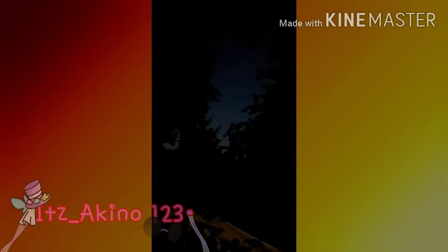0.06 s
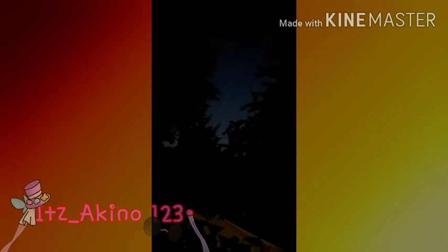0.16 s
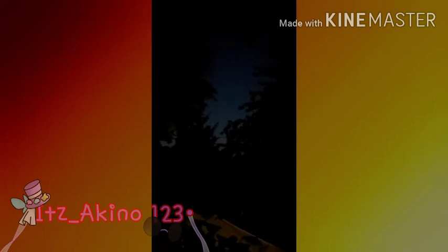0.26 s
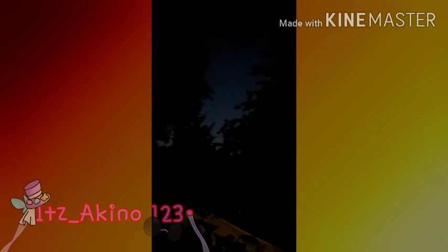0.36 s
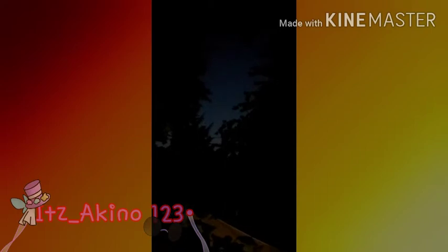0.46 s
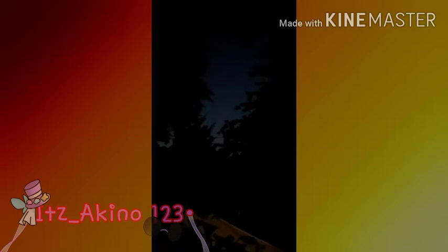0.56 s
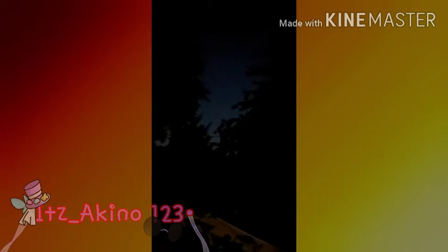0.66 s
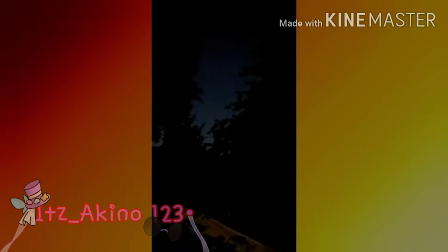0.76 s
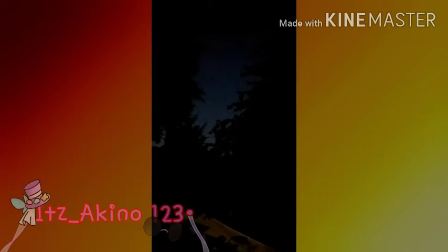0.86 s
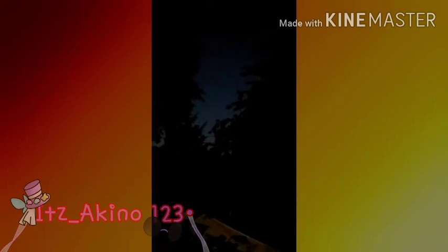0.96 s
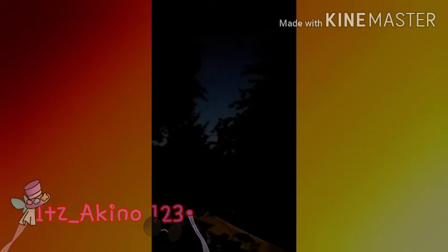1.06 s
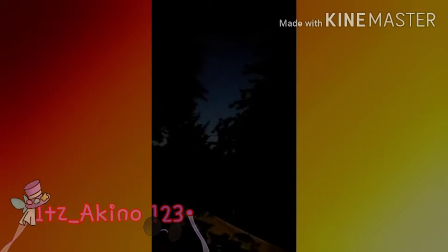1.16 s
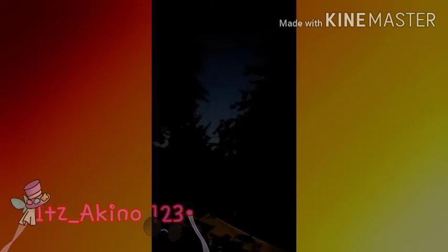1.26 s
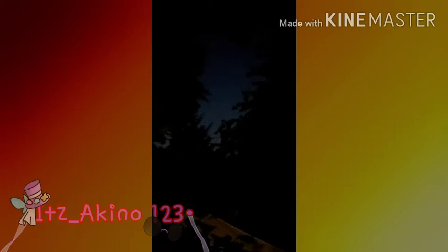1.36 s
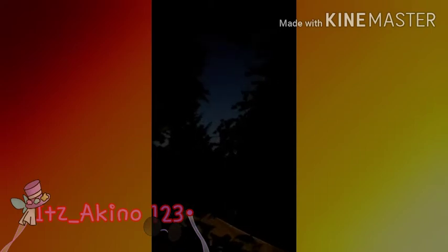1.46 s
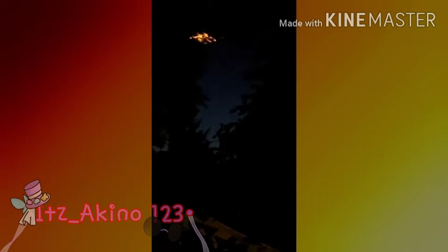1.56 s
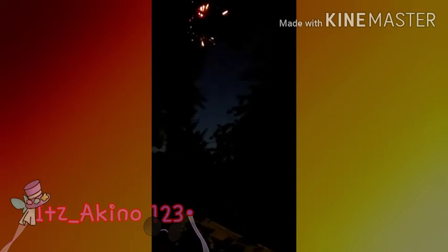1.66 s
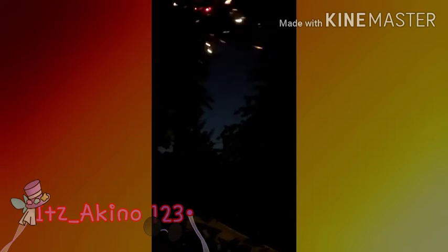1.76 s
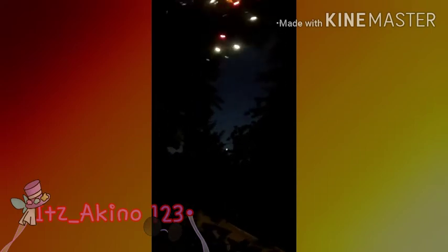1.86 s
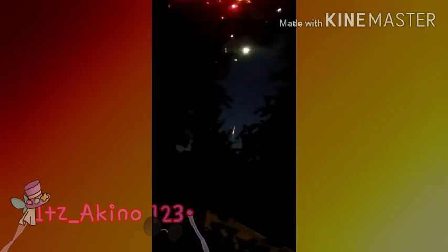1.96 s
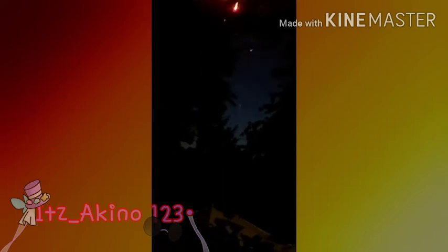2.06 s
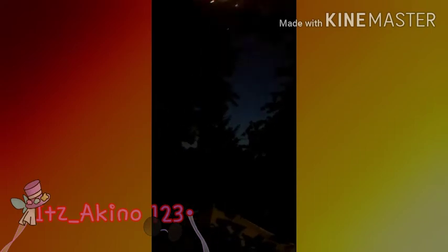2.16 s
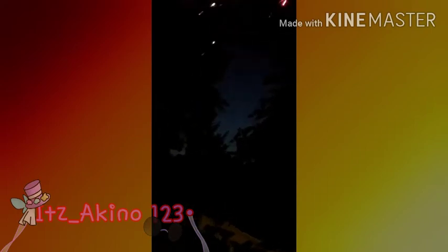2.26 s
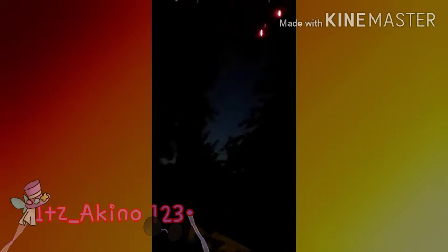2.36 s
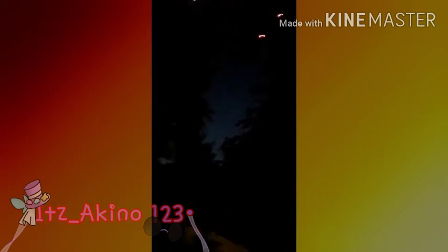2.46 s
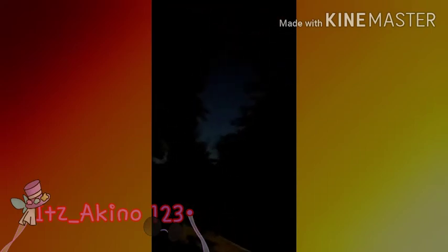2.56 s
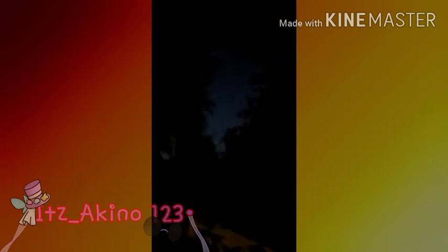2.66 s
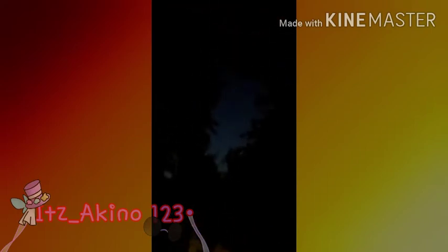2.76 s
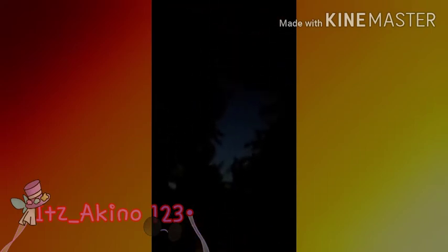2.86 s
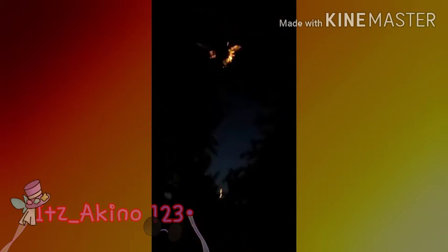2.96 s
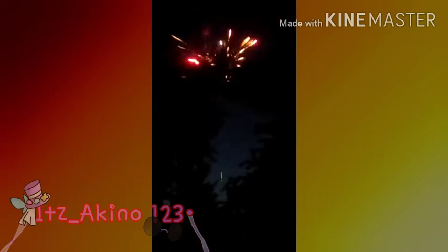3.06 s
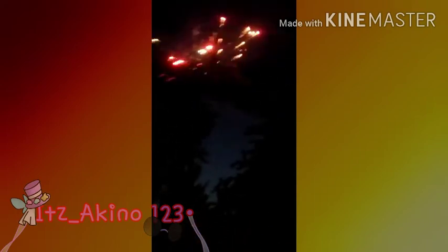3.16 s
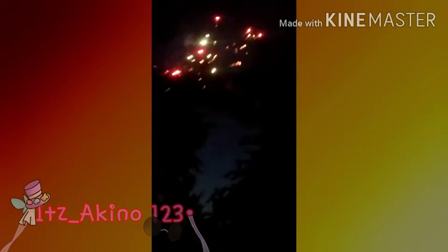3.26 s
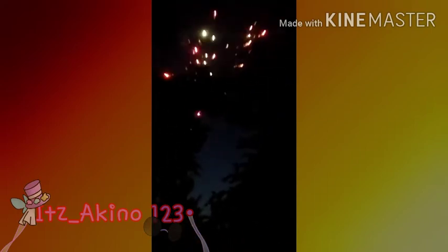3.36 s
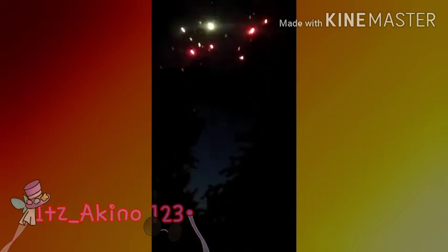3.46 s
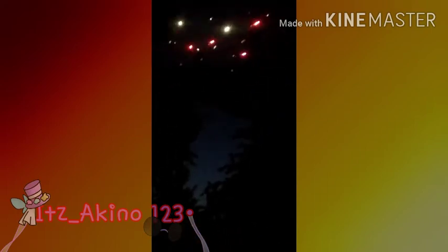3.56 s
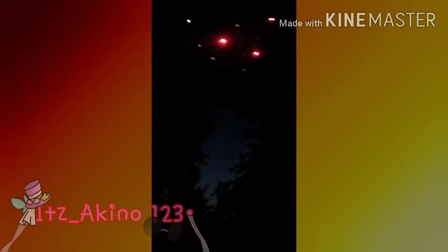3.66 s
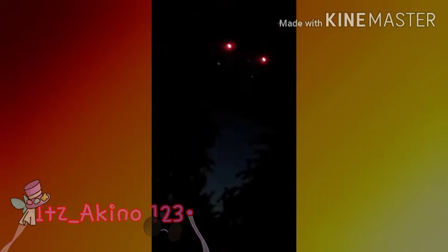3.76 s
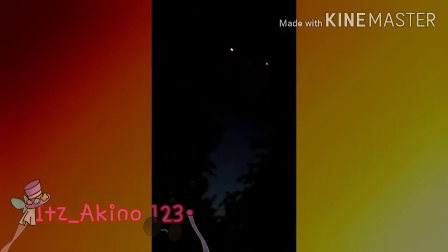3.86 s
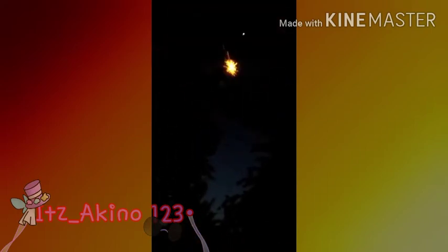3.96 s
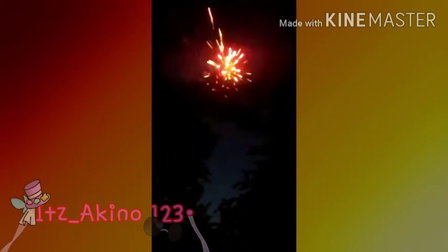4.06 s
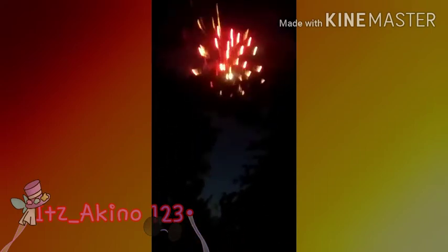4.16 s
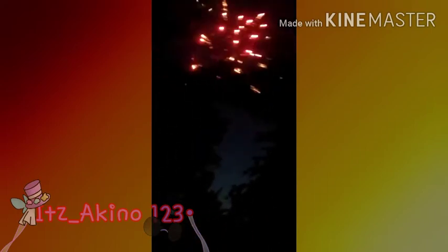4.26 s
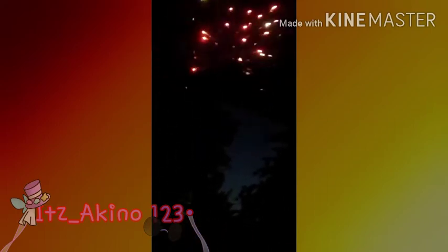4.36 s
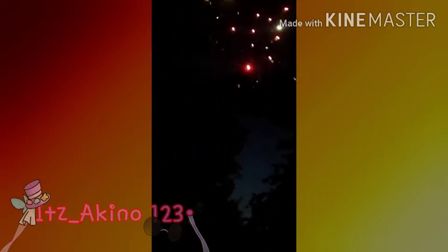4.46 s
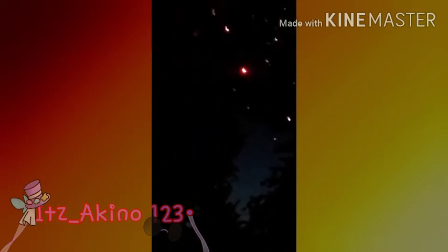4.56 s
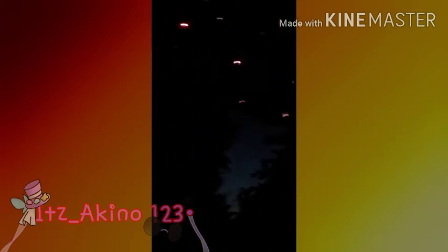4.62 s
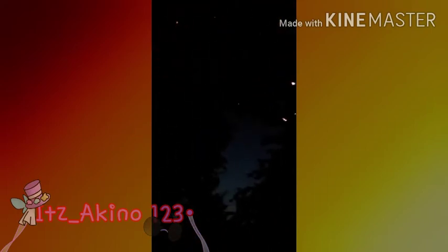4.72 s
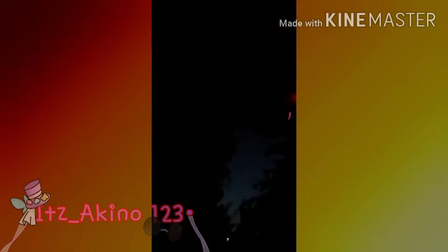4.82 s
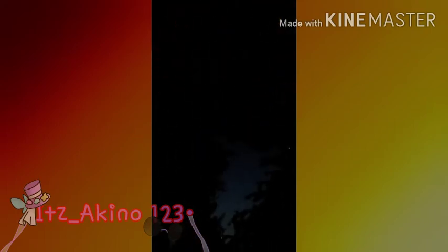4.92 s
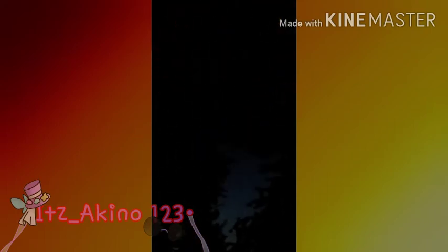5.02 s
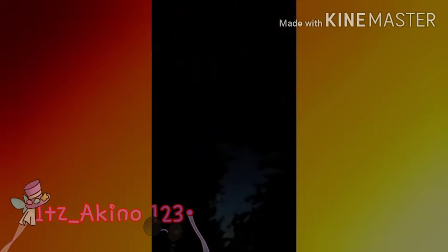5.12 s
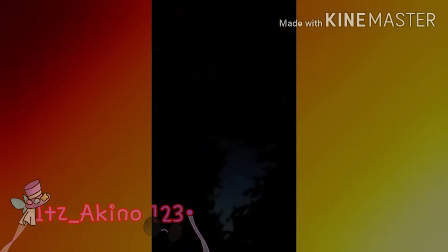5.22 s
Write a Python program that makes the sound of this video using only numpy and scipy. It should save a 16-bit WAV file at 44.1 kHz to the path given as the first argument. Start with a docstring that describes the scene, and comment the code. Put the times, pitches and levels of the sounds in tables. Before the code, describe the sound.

Soft outdoor night air runs throughout. From about 0.5 to 1.7 seconds a fuse hisses very faintly, and several quiet, dull thumps of far fireworks sound. At 1.8 seconds a shell bursts overhead with a sharp bang, and another follows at 2.1. Each bang slaps quickly off nearby walls and scatters through trees in a tail of over a second, with a faint fizz of burning stars. Sparks spit with small pops at 2.5 and 2.6 seconds. A hollow launch thump at 3.0 leads to a third bang at 3.2. The fourth bang comes at 4.3 seconds, followed by faint sputters. Two dull, echoing thumps sound at 4.8 and 5.2 seconds. Everything is heard from the ground through a small, honky microphone with almost no bass, which overloads on the four bursts.

```python
"""Fireworks at night

Four shells burst overhead, each a shock front and a few pressure swings; house walls slap back and
trees scatter the bang into a long tail. Around them: dull thumps of launches and far fireworks,
fizzing stars, sputtering sparks, a faint fuse hiss and soft night air. A small, honky microphone
with almost no bass picks it all up and overloads on the bursts."""
import sys
import numpy as np
from scipy import signal
from scipy.fft import rfft, irfft, next_fast_len
from scipy.io import wavfile
from scipy.ndimage import map_coordinates

SR = 44100
rng = np.random.default_rng(int(sys.argv[2]) if len(sys.argv) > 2 else 0)


def to_wav(sig):
    """Store sig (one row per channel, or 1-D mono) as 16-bit WAV at the path in sys.argv[1].

    Samples outside -1..1 are clipped; the rate is SR.
    """
    pcm = np.clip(np.atleast_2d(sig), -1, 1) * 32767
    pcm = np.round(pcm).astype(np.int16)
    wavfile.write(sys.argv[1], SR, pcm.T)  # frames by channels


N = 233156
TIME = np.arange(N) / SR
AGE = np.arange(2 * SR) / SR  # seconds since an event
FFT_SIZE = next_fast_len(N + SR)
FREQ = np.fft.rfftfreq(FFT_SIZE, 1 / SR)

# shell bursts (time [s], blast [dB], ring [Hz], crack [dB], yard scatter [dB], tree tail [dB],
# echo tilt [dB/octave], echo honk [dB], hollowness [dB], slap [dB], slap delay [ratio], fizz [dB])
SHELLS = [(1.8083, -18, 757, -11.5, -12, -21, 0, 1, 1, -9, 0.99, -57),
          (2.1450, -11, 1000, -10, -10, -22, 0, -1, .5, -9.5, 1, -41),
          (3.2298, -16, 1017, -13, -12.5, -24, 0.5, 1, 1, -10.5, .99, -44),
          (4.2533, -13, 990, -9, -11.5, -23, 0.5, 0.5, 5.5, -11.5, 1.05, -42)]


def amp(db):
    """Decibels to gain."""
    return 10 ** (np.asarray(db) / 20)


def unit(x):
    """Scale to rms 1."""
    return x / np.sqrt(np.mean(x ** 2) + 1e-20)


def along(points, hz):
    """Read (frequency [Hz], value) points on a log axis."""
    freqs, values = np.transpose(points)
    return np.interp(np.log(hz + 1), np.log(freqs), values)


def bell(x, centre, width):
    """A Gaussian bump of height 1."""
    return np.exp(-.5 * ((x - centre) / width) ** 2)


def add(track, s, sound):
    """Mix a sound into the track at time s."""
    part = track[round(s * SR):][:len(sound)]
    part += sound[:len(part)]


def wobble(rate, n):
    """A smooth random curve, rate knots a second."""
    knots = rng.standard_normal(int(n * rate / SR) + 4)
    return map_coordinates(knots, [np.arange(n) * rate / SR])


def coloured(x, gain):
    """Minimum-phase EQ with the given gain at each frequency: nothing rings ahead of a hit."""
    cepstrum = irfft(np.log(np.maximum(gain, 1e-6)), FFT_SIZE)
    cepstrum[1:FFT_SIZE // 2] *= 2
    cepstrum[FFT_SIZE // 2 + 1:] = 0
    return irfft(rfft(x, FFT_SIZE) * np.exp(rfft(cepstrum)), FFT_SIZE)[:len(x)]


def tilted(x, db_per_octave):
    """Brighten or dull a sound around 800 Hz."""
    return coloured(x, amp(db_per_octave * np.log2(np.clip(FREQ, 150, 8000) / 800)))


def noise(colour):
    """Steady noise shaped by (frequency [Hz], level [dB]) points."""
    return coloured(rng.standard_normal(N), amp(along(colour, FREQ)))


def puff(t60):
    """A short, dying burst of noise."""
    return rng.standard_normal(len(AGE)) * amp(-60 * AGE / t60)


def pressure_swing(hz, t60):
    """A few strong swings of pressure that start at full size."""
    return -np.cos(2 * np.pi * hz * AGE) * amp(-60 * AGE / t60)


def scatter(decay, rise_s, clump_db):
    """Countless echoes that build up, arrive in clumps, roll and die at each frequency's own speed."""
    hz, t, spectrum = signal.stft(rng.standard_normal(len(AGE)), SR, nperseg=256)
    fade = amp(-60 * t / along(decay, hz)[:, None])
    tail = signal.istft(spectrum * fade, SR, nperseg=256)[1][:len(AGE)]
    roll_db = .7 * wobble(25, len(AGE))
    build_up = 1 - np.exp(-AGE / rise_s)
    return tail * build_up * amp(clump_db * wobble(250, len(AGE)) + roll_db)


def night_air():
    """A soft, restless bed of outdoor noise."""
    # the bed's slow drift (time [s], level [dB])
    drift = [(0, -56.5), (1.7, -59.5), (2.9, -55.5), (5.3, -55)]
    # its tone (frequency [Hz], level [dB])
    colour = [(150, 12), (300, 9.5), (700, 0.5), (1100, -2.5), (2000, 5.5), (3000, 3), (5500, 2),
              (9000, 0.5)]
    level_db = np.interp(TIME, *np.transpose(drift)) + .8 * wobble(19, N)
    return amp(level_db) * noise(colour)


def fuse(attack_s=0.058, release_s=0.13, flutter_db=2.5):
    """A fuse hisses faintly on the ground before the first shell: each spurt swells, holds and dies."""
    # spurts of flame (time [s], length [s], level [dB])
    spurts = [(.45, 0.4, -41), (1.30, 0.098, -42.5), (1.52, .08, -42)]
    # the flame's thin hiss (frequency [Hz], level [dB])
    hiss = [(2500, -38), (4200, -17), (5500, -7), (6400, -7.5), (8000, -3), (15000, -6)]
    flame = np.zeros(N)
    for s, length, db in spurts:
        swell = np.clip((TIME - s) / attack_s, 0, 1)
        fade = np.clip(1 - (TIME - s - length) / release_s, 0, 1)
        flame += amp(db) * swell * fade
    return flame * amp(flutter_db * wobble(30, N)) * noise(hiss)


def stars(peak_s=.45, width_s=.25, crackle_db=3):
    """The stars of each shell flare up after the burst and burn out with a fine, crackling fizz."""
    # the sizzle of burning stars (frequency [Hz], level [dB])
    sizzle = [(2500, -35), (5000, -18), (8000, 8), (11000, 7), (15000, 1)]
    out = np.zeros(N)
    burn = bell(AGE, peak_s, width_s)
    for s, *_, fizz_db in SHELLS:
        crackle = amp(fizz_db + crackle_db * wobble(300, len(AGE)))
        add(out, s, burn * crackle * rng.standard_normal(len(AGE)))
    return coloured(out, amp(along(sizzle, FREQ)))


def sparks(pop_hz=1880, attack_s=0.00057):
    """Burning stars spit briefly with a small pitched pop."""
    # sputtering sparks (time [s], spit [dB], pop [dB])
    sputters = [(2.496, -23.5, -46), (2.626, -15, -29), (4.049, -39, -62), (4.538, -29, -61),
                (4.863, -37.5, -55)]
    # the bright tone of a spit (frequency [Hz], level [dB])
    colour = [(300, -23), (1200, -17), (2500, -23), (4000, -10), (6000, 1.5), (8000, 0), (15000, 4)]
    out = np.zeros(N)
    attack = 1 - np.exp(-AGE / attack_s)
    for s, spit_db, pop_db in sputters:
        spit = coloured(amp(spit_db) * puff(t60=0.044), amp(along(colour, FREQ)))
        pop = amp(pop_db) * pressure_swing(pop_hz, t60=0.028)
        add(out, s, (spit + pop) * attack)
    return out


def thumps(ring_hz=690, ring_db=-9, knock_tilt_db=-2.5):
    """Launches and far reports: a dull, hollow knock, followed by a swell of echoes."""
    # launches and far reports (time [s], thump [dB], echo [dB], tilt [dB/octave])
    reports = [(0.457, -47, -54.5, -1), (0.816, -52, -58, -4), (0.833, -48, -54, -8),
               (0.884, -46.5, -58, -6.5), (0.966, -52.5, -59.5, -11.5), (1.108, -60.5, -66, 4),
               (1.219, -59, -63.5, -14.5), (2.775, -41, -62, -0.5), (2.987, -27, -32.5, 0.5),
               (4.829, -31.5, -37, 0), (5.2252, -32, -40, -4)]
    # decay of their echoes near the ground (frequency [Hz], t60 [s])
    ground_decay = [(200, 1.1), (800, 0.99), (3000, 1.58), (10000, 0.73)]
    out = np.zeros(N)
    for s, thump_db, echo_db, tilt in reports:
        knock = tilted(puff(t60=0.062), tilt + knock_tilt_db)
        ring = amp(ring_db) * pressure_swing(ring_hz, t60=0.023)
        echo = tilted(scatter(ground_decay, rise_s=0.011, clump_db=0.5), tilt)
        add(out, s, amp(thump_db) * (knock + ring) + amp(echo_db) * echo)
    return out


def wall_slaps(ring_hz=900, ring_db=-3.5, dull_hz=5500):
    """Each wall answers every bang with a short, rough, dulled slap."""
    # slapback from nearby walls (delay [s], level [dB])
    walls = [(.0078, -3), (.0165, -6), (.024, -2.5), (.0275, -1), (.049, -5), (.055, -8.5), (.0715, -8.5),
             (.093, -15.5), (.153, -18.5)]
    out = np.zeros(N)
    for s, *_, slap_db, stretch, _ in SHELLS:  # delays stretch with the shell's place in the sky
        for delay, wall_db in walls:
            hz = ring_hz * np.exp(0.15 * rng.standard_normal())
            slap = amp(ring_db) * pressure_swing(hz, t60=.016) + puff(t60=0.03)
            add(out, s + stretch * delay, amp(slap_db + wall_db) * slap)
    return coloured(out, 1 / np.sqrt(1 + (FREQ / dull_hz) ** 4))


def shell_bursts(shock_db=12, blast_s=0.0066, grit_db=-3, honk_hz=1190, notch_spacing_hz=1215):
    """Each shell: a shock front, a few strong pressure swings, then the yard's and the trees' answer."""
    # short scatter from the yard (frequency [Hz], t60 [s])
    yard_decay = [(170, 0.73), (400, 0.32), (800, 0.47), (2500, 0.46), (6000, 0.49), (14000, 0.083)]
    # long tail from the ring of trees (frequency [Hz], t60 [s])
    tree_decay = [(170, 1.64), (400, 1.17), (800, 1.61), (2000, 1.434), (5000, 1.33), (8000, 0.94),
                  (14000, 2.5)]
    # treble lost on the echoes' longer path (frequency [Hz], gain [dB])
    path_loss = [(5000, 0), (6500, 0.5), (8200, 0.5), (11000, -2), (15000, -6.5)]
    out = np.zeros(N)
    honk = bell(FREQ, honk_hz, width=420)
    # a surface close to the microphone reflects only short waves and cuts evenly spaced notches
    comb_depth = np.interp(FREQ, [1200, 2400, 6000, 9000], [0.061, 0.77, 1, 0])
    comb = -np.cos(2 * np.pi * FREQ / notch_spacing_hz) * comb_depth
    blast = np.exp(-(AGE / blast_s) ** 3)  # the direct sound holds for a few cycles, then stops
    for s, blast_db, ring_hz, crack_db, yard_db, tree_db, tilt, honk_db, hollow_db, *_ in SHELLS:
        shock = -amp(shock_db) * np.exp(-AGE / .00004)
        crack = tilted(amp(crack_db) * puff(t60=0.13) * blast, db_per_octave=3)
        grit = coloured(amp(grit_db) * puff(t60=0.13) * blast, honk + amp(-22.5))
        swing = amp(blast_db) * pressure_swing(ring_hz, t60=0.076) * blast
        yard = amp(yard_db) * scatter(yard_decay, rise_s=0.0048, clump_db=2.0)
        trees = amp(tree_db) * scatter(tree_decay, rise_s=.022, clump_db=0.86)
        echoes = coloured(tilted(yard + trees, tilt), amp(honk_db * honk + along(path_loss, FREQ)))
        bang = shock + crack + grit + swing + echoes
        add(out, s, coloured(bang, amp(hollow_db * comb)))
    return out


def scene():
    """Everything that reaches the spectator, in mono."""
    return (shell_bursts() + wall_slaps() + thumps() + sparks() + stars() + fuse() + night_air())[None]


def record(dry, bass_cut_hz=174, bass_leak_db=-38, hiss_db=-68, knee=3, top_hz=15600):
    """A small microphone: honky colour, a steep bass cut, self-noise, overload and a band limit."""
    # the microphone's broad response (frequency [Hz], gain [dB])
    mic_curve = [(170, -23.5), (300, -16), (410, -9), (550, -5), (690, 0.5), (1000, -1.5), (1200, -6.5),
                 (1420, -7.5), (1800, -16), (3000, -21), (5500, -27.5), (6600, -33), (7300, -40),
                 (10500, -48.5), (15000, -51)]
    # peaks and notches, broad from its port, narrow from close walls (centre [Hz], width [Hz], gain [dB])
    resonances = [(183, 8.9, 4.5), (214, 12, -4.5), (245.3, 5.8, 6), (275, 8.4, -2.5), (306, 11, 7),
                  (366, 7.1, -5.5), (487, 12, -2.5), (512, 6.7, 1.5), (575, 8, 2), (658, 15.5, 2.5),
                  (720.6, 12, 3.5), (795, 9.5, -1.5), (818, 7, 1), (1010, 9.9, 0.5), (2020, 55, 3),
                  (2940, 120, 2.5), (3550, 186, -4), (3880, 240, 2.5), (4860, 160, -1.5), (5460, 470, 2),
                  (6170, 48, 3.5)]
    ripple_db = sum(db * bell(FREQ, hz, width) for hz, width, db in resonances)
    bass_cut = 1 / np.sqrt(1 + (bass_cut_hz / (FREQ + 1)) ** 30) + amp(bass_leak_db)
    response = unit(amp(along(mic_curve, FREQ) + ripple_db) * bass_cut)
    x = coloured(dry[0], response) + amp(hiss_db) * rng.standard_normal(N)
    x = x / (1 + np.abs(x) ** (2 * knee)) ** (.5 / knee)  # the loudest swings flatten at full scale
    return irfft(rfft(x, FFT_SIZE) * (FREQ < top_hz), FFT_SIZE)[None, :N]


dry = scene()
out = record(dry)
to_wav(out)
```